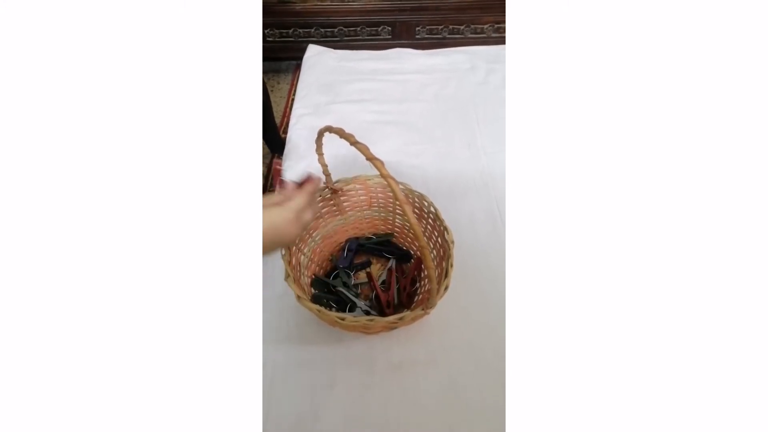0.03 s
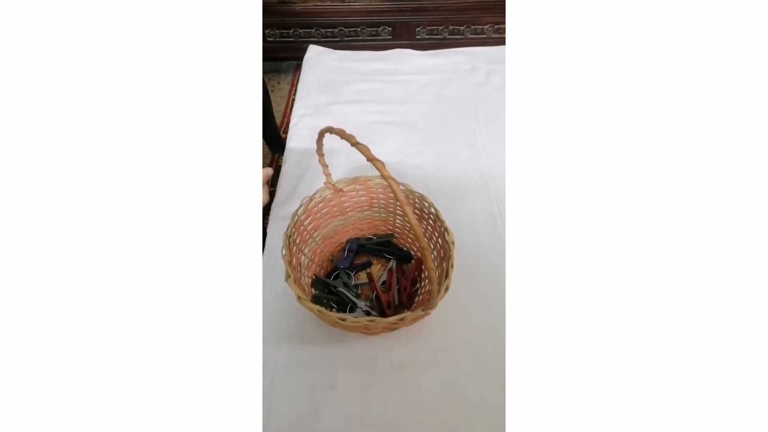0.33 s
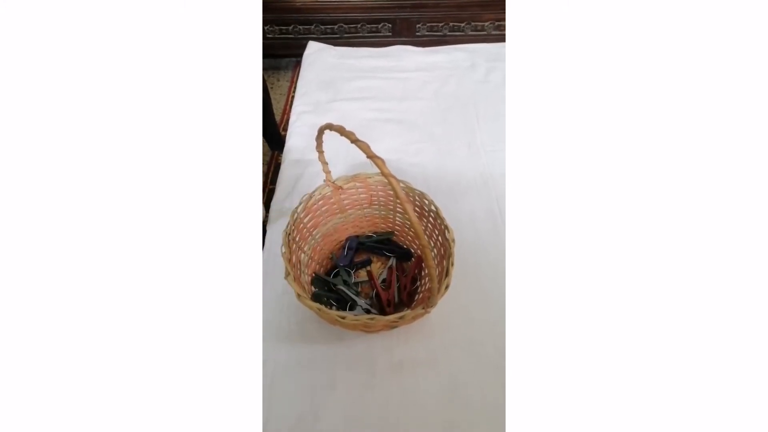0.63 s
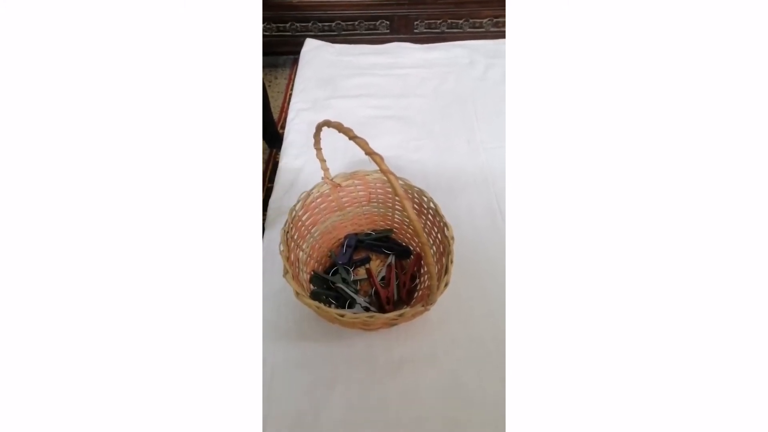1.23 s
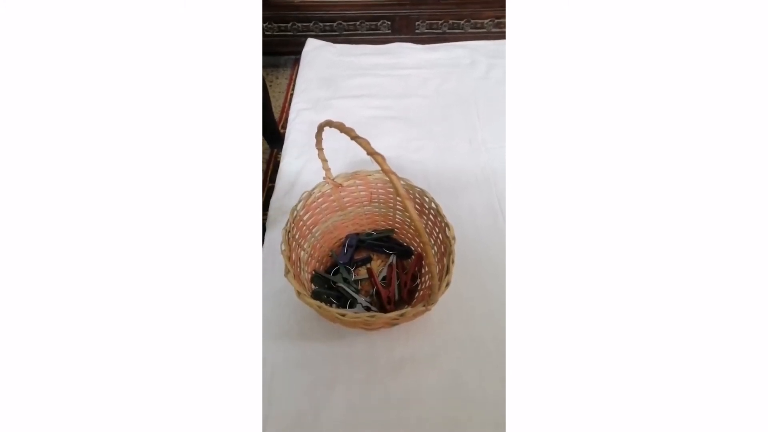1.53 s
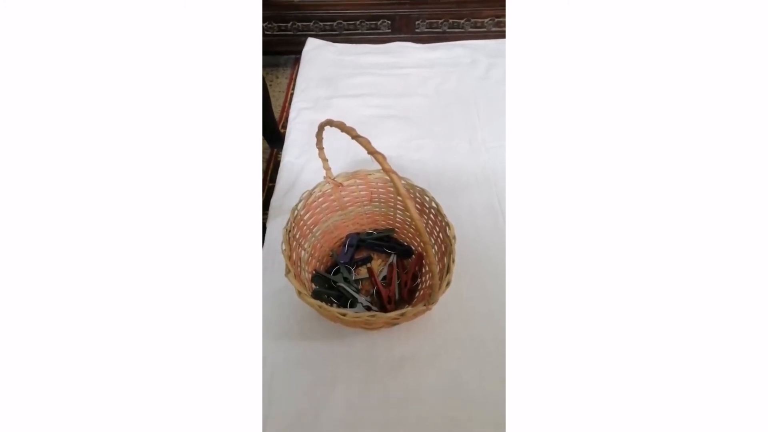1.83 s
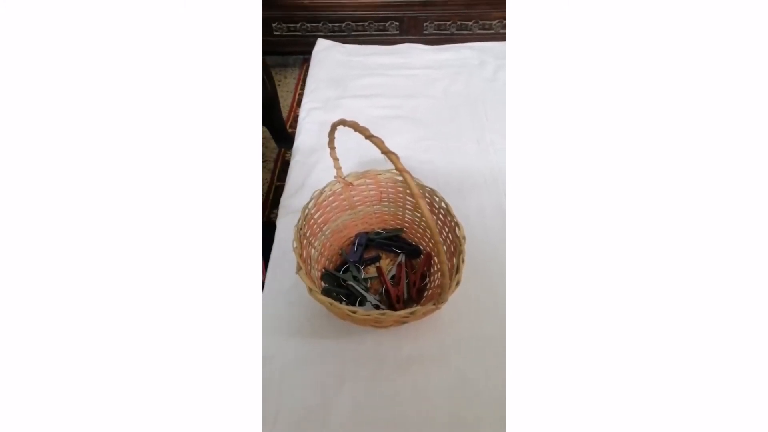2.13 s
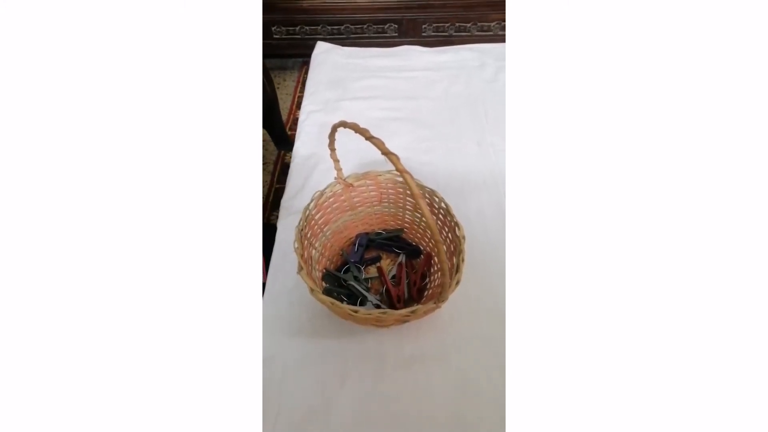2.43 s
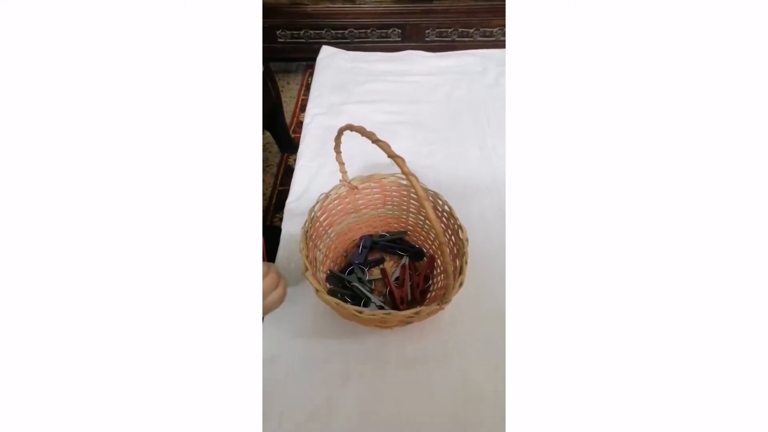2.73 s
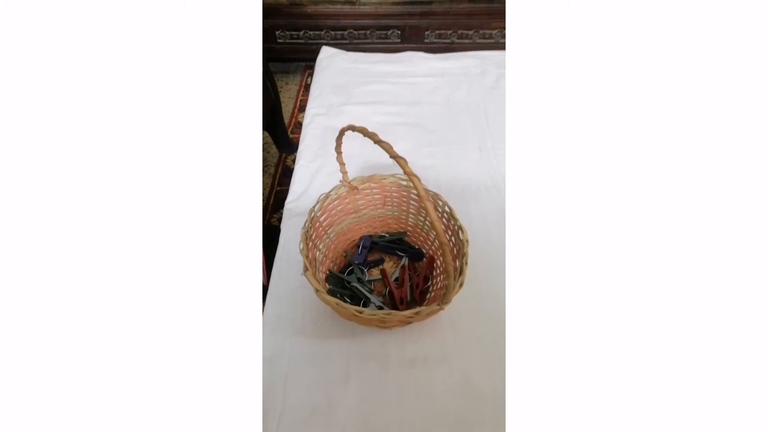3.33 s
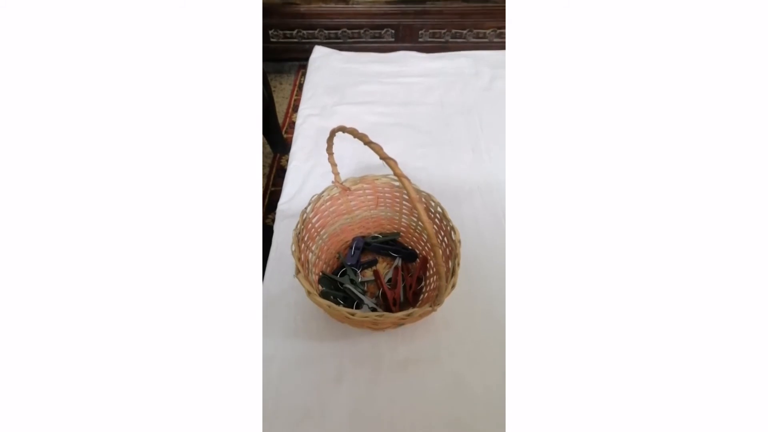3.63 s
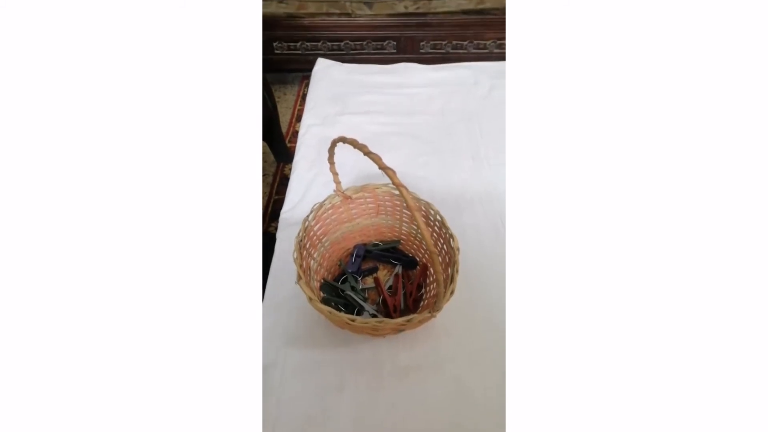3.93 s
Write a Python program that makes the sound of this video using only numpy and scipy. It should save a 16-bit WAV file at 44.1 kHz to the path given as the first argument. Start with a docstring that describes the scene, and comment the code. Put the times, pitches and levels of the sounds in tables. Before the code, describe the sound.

A clothespin snaps shut once, sharp and close, a little past halfway. Throughout, a fan hisses in a small room, its draught rumbling and thumping on the microphone, mostly on the left. Everything is quieter after the snap.

```python
"""From the start a fan rushes and hisses in a small room, and its draught rumbles and thumps on the two
microphone ports, mostly the left one. At about 2.4 s a clothespin snaps shut close by: the jaws meet
and chatter, exciting a damped resonance at 7-8 kHz. Thin tones linger faintly in the reverberant tail.
The snap makes the gain control duck and recover only partly, so everything after it is quieter."""
import sys
import numpy as np
from scipy import signal
from scipy.fft import rfft, irfft
from scipy.io import wavfile
from scipy.ndimage import uniform_filter1d, minimum_filter1d

SR = 44100
rng = np.random.default_rng(int(sys.argv[2]) if len(sys.argv) > 2 else 0)


def materialize(psi):
    """Save the field psi as 16-bit PCM at rate SR to the path in sys.argv[1].

    A 1-D psi becomes a single channel; in a 2-D psi each row is a channel.
    """
    bounded = np.clip(np.atleast_2d(psi).T, -1, 1)
    quanta = np.round(bounded * 32767).astype(np.int16)
    wavfile.write(sys.argv[1], SR, quanta)


N = 176400

# the jaws meet, then chatter; relative strength of each impact: start_s, left_db, right_db
JAW_IMPACTS = [(2.3847, 0, -8), (2.3856, -14, -9), (2.3867, -14, -16), (2.3881, -13, -19),
               (2.3892, -18, -18)]


def amp(db):
    """Amplitude ratio of a level in decibels."""
    return 10 ** (np.asarray(db) / 20)


def unit_rms(x):
    """Normalisation: scales each channel to an rms of 1."""
    return x / np.sqrt(np.mean(x ** 2, -1, keepdims=True) + 1e-20)


def over_hz(table, hz):
    """Interpolation of a table's columns along log frequency."""
    table_hz, *columns = np.transpose(table)
    return np.array([np.interp(np.log(hz + 1), np.log(table_hz + 1), c) for c in columns])


def over_time(table):
    """Linear interpolation of a table's columns at every sample."""
    time_s, *columns = np.transpose(table)
    return np.array([np.interp(np.arange(N) / SR, time_s, c) for c in columns])


def add(mix, start_s, sound):
    """Superposition: sums a sound into the mix from a given time."""
    part = mix[:, round(start_s * SR):][:, :sound.shape[1]]
    part += sound[:, :part.shape[1]]


def noise(spectrum):
    """Spectral shaping: independent noise on each port, with a given power density in dB."""
    white = rfft(rng.standard_normal((2, N))) * np.sqrt(SR / 2)
    return irfft(white * amp(over_hz(spectrum, np.fft.rfftfreq(N, 1 / SR))), N)


def patchy(x, depth_db):
    """Random amplitude modulation: small patches of time and frequency swell and fade."""
    spectra = signal.stft(x, nperseg=512)[2]
    field = uniform_filter1d(rng.standard_normal(spectra.shape), size=8, axis=1)  # along frequency
    field = uniform_filter1d(field, size=10, axis=2)  # along time
    return signal.istft(spectra * amp(depth_db * field / field.std()), nperseg=512)[1][:, :N]


def fan():
    """Aerodynamic noise: the blades rush in the mid-range and the air hisses, each drifting in level."""
    # noise spectra before the drift: frequency_hz, left_db, right_db
    rush_spectrum = [(40, -56.5, -101), (200, -88.5, -77), (425, -71.5, -79), (560, -87.5, -89),
                     (618, -77, -77.5), (900, -76, -81), (1017, -81.5, -87.5), (1256, -88, -81.5),
                     (1580, -91, -92.5), (1830, -94, -89), (2450, -99.5, -100), (4050, -118, -118)]
    hiss_spectrum = [(1230, -108, -108), (2310, -95.5, -92), (3040, -94, -91), (3890, -102, -100),
                     (4440, -100, -97), (5170, -95.5, -90), (7000, -95.5, -89.5), (7470, -91.5, -99),
                     (9280, -102, -105), (11600, -108.5, -110), (15000, -111, -110)]
    # drifting gain of each noise: time_s, left_db, right_db
    rush_drift = [(0, 1, 0.5), (1.1, 3, 1.5), (1.4, 0.5, 3), (2.36, 0.5, 1.5), (2.42, -3, 2),
                  (2.58, -1, 2.5), (2.78, 1.5, 7.5), (2.95, 1, 8.5), (3.04, -1, 1), (3.2, 1, 6),
                  (3.55, -4, 1.5), (4, -5.5, -4)]
    hiss_drift = [(0, 0.5, -2.5), (.8, 2, -2), (1.1, 0.5, -1.5), (1.3, 1, -0.5), (2.36, -1, -2.5),
                  (2.5, 0, 1), (2.8, -2, -2), (3.35, -2.5, -1), (3.72, -7, -5), (4, -4.5, -4)]
    rush = noise(rush_spectrum) * amp(over_time(rush_drift))
    hiss = noise(hiss_spectrum) * amp(over_time(hiss_drift))
    return patchy(rush + hiss, depth_db=1.81)


def draught():
    """Turbulence: pressure fluctuates independently at each port, giving a low, lumpy rumble."""
    # strength of the draught on each port: time_s, level_db
    left_strength = [(0, -15), (.08, -24), (.29, -25), (.4, -19), (.48, -34.5), (.56, -21), (.67, -25.5),
                     (.77, -35), (.825, -14.5), (.88, -31.5), (.91, -18.5), (.945, -34), (1.0, -15.5),
                     (1.06, -27), (1.12, -16), (1.27, -31.5), (1.39, -21.5), (1.51, -24.5), (1.61, -22.5),
                     (1.65, -26), (1.7, -20.5), (1.76, -21.5), (1.87, -28.5), (1.94, -23.5), (2.0, -23.5),
                     (2.1, -18), (2.14, -27), (2.27, -23), (2.38, -26), (2.5, -22), (2.75, -49),
                     (2.81, -28), (2.89, -36.5), (2.93, -49), (2.98, -30.5), (3.11, -40), (3.24, -33),
                     (3.32, -44.5), (3.39, -30.5), (3.5, -30), (3.69, -22.5), (3.74, -28), (3.9, -21.5),
                     (4, -36)]
    right_strength = [(0, -32), (.16, -29), (.56, -49.5), (.64, -28), (.86, -46), (1.02, -33.5),
                      (1.13, -31.5), (1.24, -23), (1.5, -43), (1.66, -23), (1.9, -34.5), (2.02, -23.5),
                      (2.18, -38.5), (2.26, -25), (2.4, -39), (2.48, -33), (2.54, -39), (2.74, -43),
                      (2.94, -49), (3.62, -40), (3.7, -31.5), (3.83, -46), (3.89, -28.5), (4, -33)]
    # spectral shape of the turbulence: frequency_hz, left_db, right_db
    rumble_shape = [(9.9, -3.5, -6), (25.5, 1, -22), (44, 4, 7.5), (93, 6, -1), (194, -2, -1),
                    (263.5, -9, -13.5), (427, -19.5, -17), (564, -28.5, -26.5), (974, -56, -34),
                    (2550, -102.5, -65)]
    lump_depth_db, lump_sigma_s = 2.5, 0.006
    t = np.arange(-SR // 10, SR // 10) / SR
    bell = np.exp(-0.5 * (t / lump_sigma_s) ** 2)
    lumps = unit_rms(signal.fftconvolve(rng.standard_normal((2, N)), bell[None], "same"))
    strength = amp(np.vstack([over_time(left_strength), over_time(right_strength)]))
    return strength * unit_rms(noise(rumble_shape) * amp(lump_depth_db * lumps))


def eddies():
    """Pressure pulses: each eddy sucks at a port, then pushes, a dull knock with little deep bass."""
    # eddies striking a port, before the low-pass: centre_s, port, level_db, spectral_peak_hz
    strikes = [(.051, "left", -12.5, 260), (.155, "left", -18.5, 160), (0.315, "left", -7.5, 123),
               (0.333, "left", -22, 280), (.385, "left", -7, 127), (.389, "left", -12, 171),
               (.434, "left", -14, 106), (0.559, "left", -13.5, 113), (0.823, "left", -10, 123),
               (.901, "left", -9, 101), (0.967, "left", -9, 148), (.999, "left", -20, 200),
               (1.118, "left", 0, 340), (1.123, "left", -3, 300), (1.132, "left", -1.5, 97),
               (1.141, "left", -7, 164), (1.236, "right", -17, 79), (1.387, "left", -10.5, 175),
               (1.428, "left", -9, 195), (1.435, "left", -11, 172), (1.532, "left", -16, 161),
               (1.644, "right", -15, 119), (1.692, "right", -8, 142), (1.768, "left", -10, 137),
               (1.825, "left", -10, 122), (1.849, "right", -15.5, 145), (1.96, "left", -13.5, 200),
               (2.069, "left", -11, 116), (2.265, "left", -11.5, 103), (2.820, "left", -22.5, 109),
               (2.884, "left", -18.5, 80), (2.977, "left", -15.5, 100), (3.393, "left", -17.5, 125),
               (3.491, "left", -20.5, 245), (3.633, "left", -18, 200), (3.639, "left", -16, 223),
               (3.664, "left", -35, 280), (3.674, "left", -14.5, 253), (3.686, "left", -16, 160),
               (3.696, "left", -14, 200), (3.699, "right", -18, 146), (3.704, "left", -14, 297),
               (3.895, "left", -15, 140), (3.981, "left", -15.5, 119)]
    cutoff_hz, suction_rad = 990, 0.65  # 0 rad is a plain push; at 1.57 suction equals push
    out = np.zeros((2, N))
    t = np.arange(-SR // 40, SR // 40) / SR
    for centre_s, port, level_db, hz in strikes:
        pulse = np.hanning(len(t)) / (1 - 1j * np.pi * hz * t) ** 3
        knock = amp(level_db) * (pulse * np.exp(-1j * suction_rad)).real
        add(out[:1] if port == "left" else out[1:], centre_s + t[0], knock[None])
    return signal.sosfiltfilt(signal.butter(4, cutoff_hz, fs=SR, output="sos"), out)


def impulse_response(spectrum, lead_s):
    """Both ports share the minimum phase of their mean spectrum; delayed by lead_s, each with peak 1."""
    log_gain = np.log(amp(over_hz(spectrum, abs(np.fft.fftfreq(2048, 1 / SR)))))
    phase = -signal.hilbert(log_gain.mean(0)).imag
    response = np.fft.ifft(np.exp(log_gain + 1j * phase)).real
    response = np.roll(response, round(lead_s * SR), 1)
    return response / abs(response).max(1, keepdims=True)


def clothespin():
    """Impact excitation: each contact of the jaws drives the same high, quickly damped resonance."""
    # spectral shape, a broad 7-8 kHz resonance over a thin crack: frequency_hz, left_db, right_db
    resonance = [(500, -47, -42), (1700, -44, -34), (2150, -36, -27), (3400, -41, -28), (4800, -39, -32),
                 (5150, -23, -14), (5500, -23, -14), (6050, -19, -10), (6550, -14, -8), (6900, -2, -2),
                 (7200, 0, -2.5), (8050, -1.5, -1), (8400, -8, -13), (9100, -21, -17), (10200, -25, -20),
                 (12000, -24.5, -20), (13200, -17, -12), (14000, -22, -16), (14900, -18, -12),
                 (16000, -32, -30)]
    snap_db, lead_s = 9.5, 0.0005
    port_delay_s = 1 / SR  # the sound reaches the left port first
    ring = impulse_response(resonance, lead_s)
    out = np.zeros((2, N))
    for start_s, left_db, right_db in JAW_IMPACTS:
        add(out[:1], start_s - lead_s, amp(snap_db + left_db) * ring[:1])
        add(out[1:], start_s - lead_s + port_delay_s, amp(snap_db + right_db) * ring[1:])
    return out


def faint_ring():
    """Exponential decay: thin tones at about 7-8 kHz linger in the snap's reverberant tail."""
    # lingering tones: pitch_hz, left_db, right_db, t60_s
    tones = [(7150, -36, -36, 0.28), (7145, -32, -39, 0.3), (8000, -39, -42, 0.35), (8360, -34, -41, 0.3),
             (8150, -34, -43, 0.33)]
    out = np.zeros((2, N))
    t = np.arange(SR // 2) / SR
    for pitch_hz, left_db, right_db, t60_s in tones:
        tone = amp(-60 * t / t60_s) * np.sin(2 * np.pi * pitch_hz * t)
        add(out, JAW_IMPACTS[0][0], amp([[left_db], [right_db]]) * tone)
    return out


def room(x):
    """Reverberation: a few early reflections and a short diffuse tail whose top dies soonest."""
    # early reflections: delay_s, left_db, right_db
    reflections = [(0.011, -23, -18), (0.017, -20, -23), (.0200, -24, -26)]
    # reverberation time: frequency_hz, t60_s
    decay_times = [(1000, 0.28), (5000, 0.29), (7900, 0.25), (10000, 0.24), (15000, 0.14)]
    tail_left_db, tail_right_db, onset_s = -9.5, -7.0, 0.007
    hz, t, spectra = signal.stft(rng.standard_normal((2, SR // 2)), SR, nperseg=256)
    decay = amp(-60 * t / over_hz(decay_times, hz).T)
    tail = signal.istft(spectra * decay, SR, nperseg=256)[1]
    tail *= np.minimum(np.arange(tail.shape[1]) / SR / onset_s, 1) ** 2
    response = tail / np.linalg.norm(tail[0]) * amp([[tail_left_db], [tail_right_db]])
    for delay_s, left_db, right_db in reflections:
        add(response, delay_s, amp([[left_db], [right_db]]))
    return signal.fftconvolve(x, response, axes=1)[:, :N]


def scene():
    """Superposition: the snap, its reverberation and a faint ring add to the fan and its draught."""
    snap = clothespin()
    return snap + room(snap) + faint_ring() + fan() + draught() + eddies()


def peak_decay(level_db, db_per_s):
    """Peak detection: follows each peak, then falls at a steady rate."""
    fall_db = np.arange(N) / SR * db_per_s
    return np.maximum.accumulate(level_db + fall_db) - fall_db


def record(dry):
    """Automatic gain control, most sensitive to treble, ducks at peaks; a low-pass then limits the band."""
    threshold_db, treble_weight, band_edge_hz = -6.5, 0.38, 15500
    attack_s, hold_s, slow_share = 0.0027, 0.034, 0.46
    attack, half_hold = round(attack_s * SR), round(hold_s * SR / 2)
    peak = np.hypot(dry, treble_weight * np.diff(dry, prepend=0)).max(0)
    excess_db = np.maximum(20 * np.log10(peak + 1e-9) - threshold_db, 0)
    excess_db = -minimum_filter1d(-excess_db, attack)  # running maximum, looking slightly ahead
    held_db = -minimum_filter1d(-excess_db, 2 * half_hold + 1, origin=half_hold)
    quick_db = peak_decay(held_db, db_per_s=32.5)
    slow_db = peak_decay(slow_share * excess_db, db_per_s=1.27)  # part of the reduction lingers
    duck_db = uniform_filter1d(np.maximum(quick_db, slow_db), attack)
    low_pass = signal.firwin(255, band_edge_hz, window=("kaiser", 9), fs=SR)
    return signal.oaconvolve(dry / amp(duck_db), low_pass[None], "same")


dry = scene()
out = record(dry)
materialize(out)
```